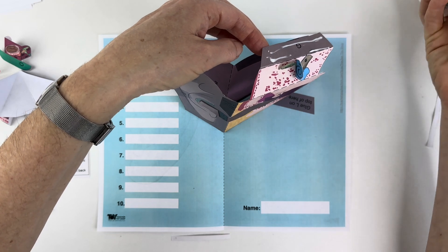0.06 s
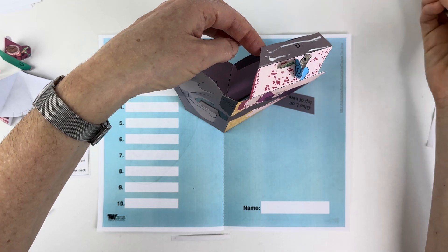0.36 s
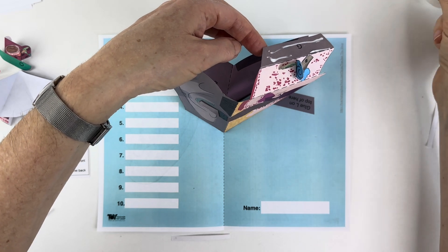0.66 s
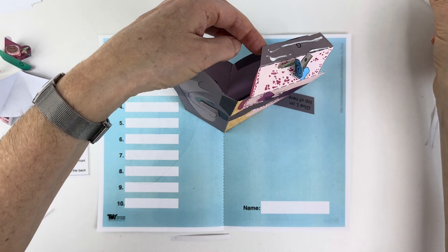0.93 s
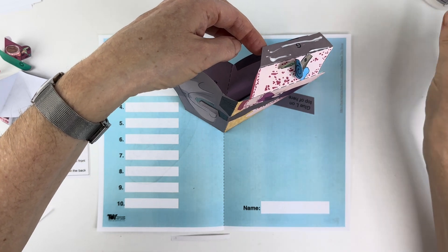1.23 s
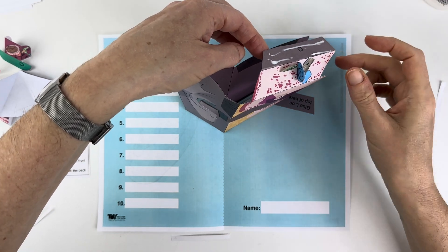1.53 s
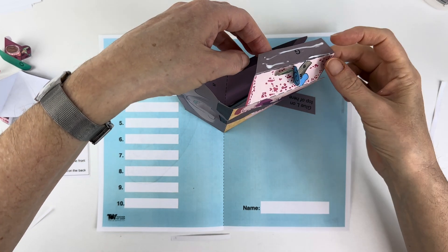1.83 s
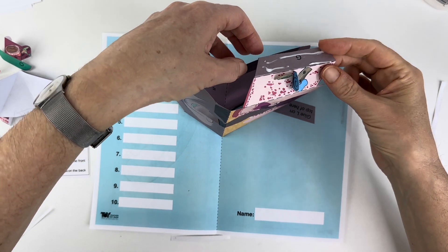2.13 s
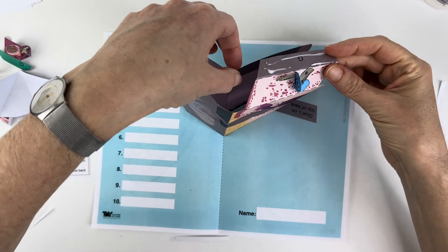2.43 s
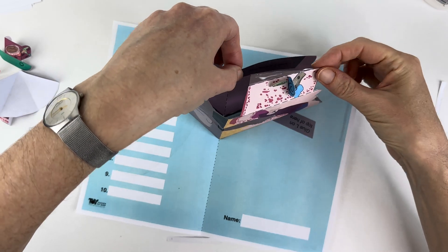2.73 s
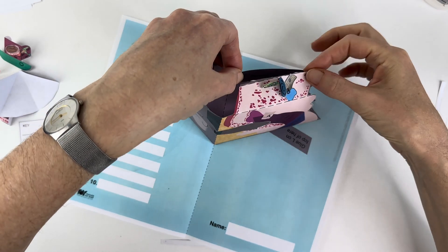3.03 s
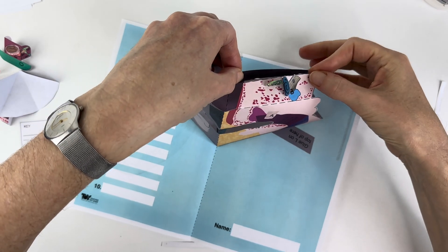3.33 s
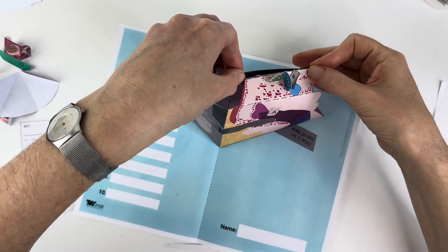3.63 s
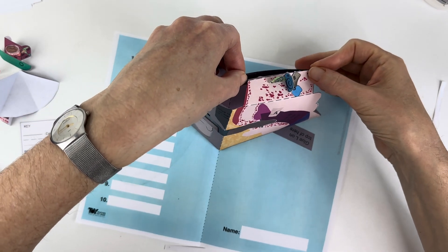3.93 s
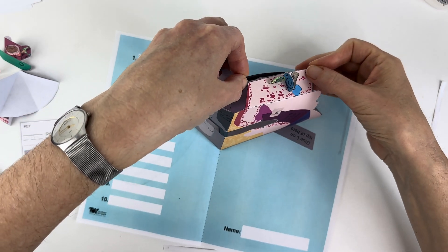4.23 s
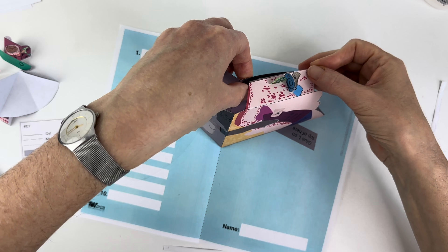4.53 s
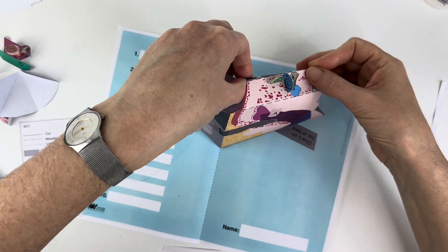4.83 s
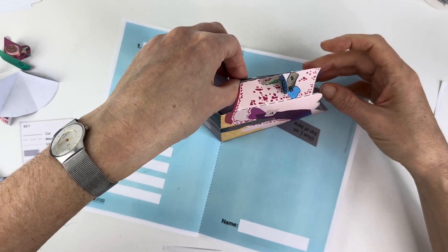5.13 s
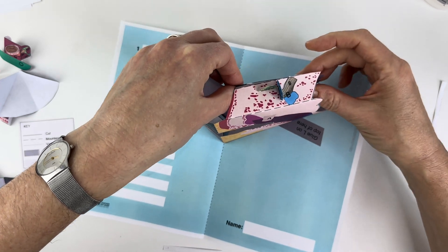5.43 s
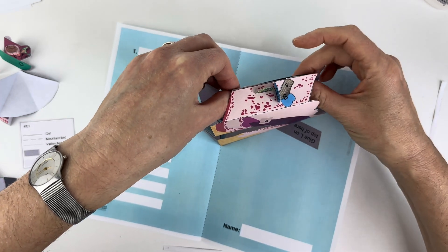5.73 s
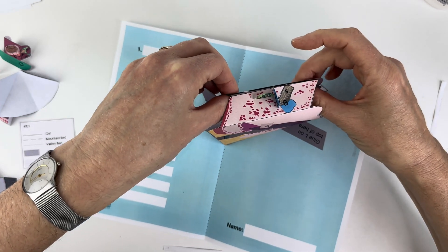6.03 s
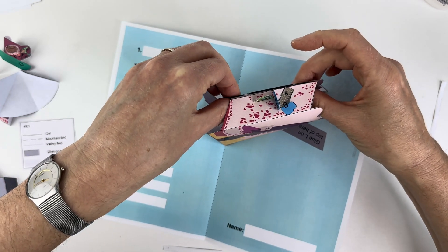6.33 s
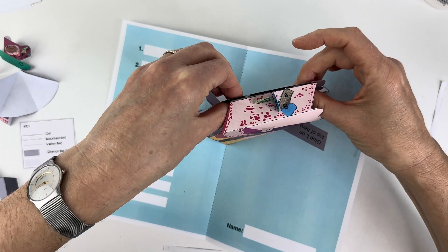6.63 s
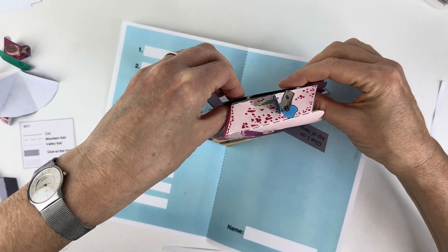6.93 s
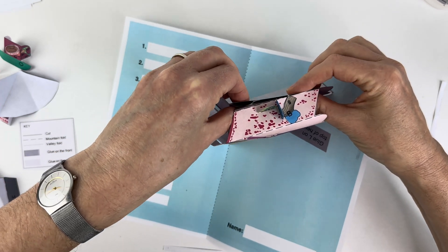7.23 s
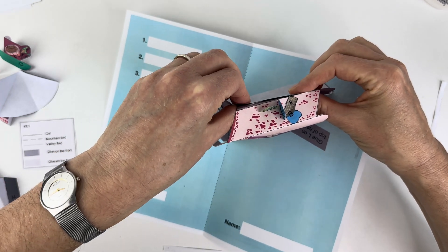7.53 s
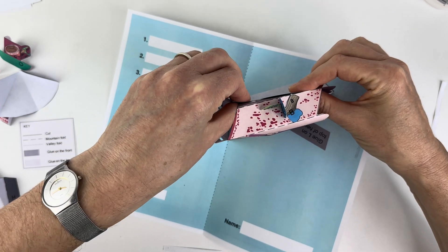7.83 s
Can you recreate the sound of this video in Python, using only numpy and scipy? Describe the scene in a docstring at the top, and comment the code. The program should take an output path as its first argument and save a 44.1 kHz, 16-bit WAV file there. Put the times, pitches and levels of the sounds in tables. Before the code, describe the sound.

Hands press and rub a small hollow card model, with soft taps, scrapes and rustles over a low room hum.

```python
"""A small hollow card model sounds as two hands press its glued flaps together on a desk.
Fingertips buckle the card and set its flaps ringing; friction of skin, paper and cut edges excites
its resonances, and the squeezed joint creaks faintly. Bumps drive the desk's bending modes and rattle
the card. A close two-port microphone also hears the quiet room: motor hum, rumble, hiss, a faint whine."""
import sys
import numpy as np
from scipy import signal
from scipy.fft import rfft, irfft
from scipy.io import wavfile
from scipy.ndimage import uniform_filter1d

SR = 44100
rng = np.random.default_rng(int(sys.argv[2]) if len(sys.argv) > 2 else 0)


def pcm_store(signal):
    """Save signal as 16-bit PCM."""
    levels = np.round(np.clip(np.atleast_2d(signal), -1, 1) * 32767)
    wavfile.write(sys.argv[1], SR, levels.astype(np.int16).T)


N = 347067
TIME = np.arange(N) / SR

# motor hum and high whine: (frequency [Hz], rms level [dB])
ROOM_TONES = [(131.7, -57), (263.4, -78.5), (15558, -81.5)]
# rumble, hiss and diffuse air noise of the room: (frequency [Hz], spectral density [dB])
RUMBLE_SPECTRUM = [(10, -116), (25, -92), (52, -73), (80, -76), (110, -83), (145, -74), (185, -87.5),
                   (260, -97), (450, -101), (750, -119), (2000, -145)]
HISS_SPECTRUM = [(500, -125), (850, -113), (1020, -104), (1150, -102), (1550, -92.5), (2500, -94),
                 (3800, -101), (4700, -109.5), (5400, -107), (5950, -113), (7000, -108), (8600, -123),
                 (12500, -131), (15600, -112)]
AIR_SPECTRUM = [(30, -108), (130, -96.5), (220, -99), (450, -101), (800, -109), (1400, -116), (3000, -123),
                (4300, -121), (4950, -114), (5700, -124), (9000, -135)]
# squeeze of the fingers on the joint: (time [s], grip [0-1])
JOINT_GRIP = [(0, 0.08), (1.7, 0), (2.1, 0.9), (2.8, 0), (2.88, 0), (3.3, 0), (3.6, 0.23), (5.9, 0.76),
              (6.5, 0.4), (7.4, 1), (7.8, 0.1)]
# resonances of the hollow model: (frequency [Hz], bandwidth [Hz], gain [dB])
CARD_RESONANCES = [(310, 45, 2), (365, 50, 1), (480, 45, 0), (765, 55, 5), (985, 70, 4), (1050, 60, 1),
                   (1270, 50, 1), (1580, 70, 5), (1890, 70, 5), (2060, 80, 4), (2680, 70, 5), (3060, 80, 3),
                   (3540, 80, 4)]
# taps on the card, mostly by fingertips; the row at 0.967 s is the card's sharp first clack as a desk bump
# jolts it: (time [s], knock level [dB], hardness [0 pad to 1 nail], scuff level [dB], buckling t60 [s], flap
# pitch [Hz], ring level [dB], overtone tilt [dB/octave])
CARD_TAPS = [(.213, -50.5, 0.14, -59, 0.1, 313, -55, 6), (.231, -51, 0.48, -54, 0.1, 733, -48, -7),
             (.7458, -47, 0.64, -53, 0.034, 1970, -47, -15),
             (.967, -51.5, 0.67, -72, 0.037, 1114, -52, -8),
             (2.759, -62, 0.83, -49, 0.082, 1090, -67, -4), (2.818, -63, 0.6, -59, 0.041, 970, -79, 0),
             (3.496, -57, 1, -69, 0.028, 1070, -70, 6), (3.644, -58, 0.42, -55, 0.11, 1050, -60, -6),
             (3.668, -66, 0.37, -49, 0.1, 1065, -56, -10), (4.015, -65, 0.43, -69, .04, 870, -65, -6),
             (4.159, -56.5, 0.34, -50.5, .06, 1060, -59, 18),
             (4.168, -53, .48, -52, 0.047, 1010, -53.5, 10), (4.178, -70, 0.39, -72, 0.066, 467, -57, 5),
             (4.367, -67, 0.75, -67, 0.1, 1060, -60, 4), (4.4192, -55, 0.9, -48, 0.027, 1020, -52.5, -15),
             (4.535, -72, 0.47, -69, 0.035, 1030, -68, 4), (4.707, -66, 0.51, -67, .05, 760, -70, -3),
             (5.383, -56, 0.63, -70, 0.14, 900, -58, -5), (5.414, -50.5, .8, -51.5, 0.023, 467, -48, 5),
             (5.459, -58, 0.33, -58, .07, 480, -53, 6), (5.4837, -49, 0.63, -37.5, .03, 2035, -41, -16),
             (5.4989, -41, 0.84, -45, 0.026, 795, -41, 3),
             (5.504, -41, 0.7, -66, 0.028, 1603, -46.5, -12), (5.508, -38, 0.53, -69, .03, 350, -45, 1),
             (5.546, -64, 0.49, -56, 0.039, 2050, -55, -14), (5.563, -66, .91, -66, .05, 1970, -61, -12),
             (5.671, -51, .6, -74, 0.065, 370, -55.5, 4), (5.94, -72, 0.61, -61, .06, 1040, -64, 0),
             (6.025, -55.5, 0.42, -76, 0.1, 396, -51.5, -24), (6.154, -63, 0.33, -63, 0.07, 765, -77, -1),
             (6.293, -72, .6, -67, .04, 1020, -65, 4), (6.486, -75, 0.55, -70, .04, 1000, -72, 2),
             (6.666, -57, 0.4, -80, 0.068, 397, -59, -7),
             (6.719, -52.5, 0.67, -54, 0.054, 1044, -49.5, 2),
             (6.996, -66, 0.5, -53, 0.051, 1010, -73, -2),
             (7.026, -48.5, 0.18, -70, 0.053, 372, -49, 5.5),
             (7.147, -60.5, 0.35, -61, 0.024, 974, -73, 3), (7.22, -56, 0.52, -60, 0.19, 994, -70, -2),
             (7.429, -77, 0.44, -61, .02, 1000, -78, 0),
             (7.4715, -40, 0.61, -67, 0.032, 1863, -50.5, -10)]
# scuff of a touch: (frequency [Hz], relative density [dB])
SCUFF_SPECTRUM = [(1000, 5), (2400, 5), (3500, 0), (4700, -1), (9500, -3), (13000, -23), (16000, 1)]
# modes of a flap: (frequency ratio [1], relative level [dB], t60 [s])
FLAP_MODES = [(0.998, 3, 0.045), (1.96, -1, 0.015), (3.52, -9.5, 0.028)]
# bumps on the desk: (time [s], level [dB], contact time [s])
DESK_BUMPS = [(0.392, -53, 0.0016), (0.7431, -23.5, 0.0017), (.934, -47, 0.0023), (0.9654, -35.5, .0014),
              (1.086, -51.5, 0.0021)]
# modes of the desk top: (frequency [Hz], relative level [dB], t60 [s])
DESK_MODES = [(110, -4.5, 0.45), (133, 5.5, 0.12), (175, -2.5, .3), (270, -1.5, 0.14), (303, -12.5, 0.24),
              (404, -12, .18), (490, -28, .09), (573, -22, 0.073), (690, -26, .12)]
# first bending wave through the desk: (frequency [Hz], relative density [dB])
DESK_WAVE_SPECTRUM = [(60, -28), (130, -23), (230, 7), (420, 5), (700, -20), (2000, -5), (5000, -47)]
# strokes of skin and paper: (time of peak speed [s], slowing time [s], level [dB], pressure [0-1])
RUB_STROKES = [(0.44, 0.26, -65.5, 0.65), (1.777, 0.17, -64.5, 0.46), (1.88, 0.38, -64.5, 0.3),
               (2.196, 0.21, -60.5, .25), (2.407, 0.089, -62, 0), (2.613, 0.27, -59.5, 0.34),
               (2.738, 0.25, -58, 0), (3.003, 0.11, -63, 0), (3.235, .1, -59, .13), (3.497, 0.11, -60, 0.5),
               (3.807, 0.53, -66.5, 0.63), (4.24, 0.3, -59.5, 0.25), (4.586, 0.19, -56.5, 0.71),
               (4.706, 0.25, -61, 0.79), (4.919, 0.081, -62, 0.8), (5.22, 0.82, -67, 0),
               (5.386, 0.053, -57.5, 0.93), (5.462, 0.12, -56.5, 0.54), (5.57, 1, -68, 1),
               (5.86, 0.1, -55.5, 0.46), (6.99, 0.21, -65, 0.6), (7.313, 0.2, -64, 0.46)]
# fingertip drag, card rasp, fibre hiss and scraping edge: (frequency [Hz], relative density [dB])
DRAG_SPECTRUM = [(150, -64), (380, 0.5), (750, 0.5), (1150, -9.5), (3000, -22), (8000, -69)]
RASP_SPECTRUM = [(500, -28), (1200, -3), (2200, -2), (3500, -6), (5000, -5), (10000, -24)]
FIBRE_SPECTRUM = [(1000, -37), (3500, 13.5), (5000, 10.5), (7000, 6), (10000, -7), (13000, -29), (16000, 1)]
EDGE_SPECTRUM = [(700, -21), (1400, -5), (2500, 0), (3900, -2), (5000, -7), (10000, -13.5), (13000, -43)]
# strokes of a cut edge: (time of peak speed [s], slowing time [s], level [dB])
EDGE_STROKES = [(2.092, 0.088, -49.3), (2.324, 0.071, -56), (2.679, 0.18, -53), (5.856, 0.1, -53)]
# lead of the left port over the right: (frequency [Hz], phase [rad])
PORT_PHASE = [(560, 0), (760, -1.7), (1000, .1), (1300, -.4), (1600, 0), (2450, -.2), (2750, .4),
              (4100, -.1), (4700, -1.1), (5200, -5.2), (5600, -6.1), (6300, -6.4), (9500, -8),
              (12500, -9.4), (15800, -10.4)]


def undb(db):
    """Amplitude grows tenfold for every 20 dB."""
    return 10 ** (np.asarray(db) / 20)


def unit(x):
    """Normalisation sets the rms to 1."""
    return x / np.sqrt(np.mean(x ** 2))


def decay(t, t60):
    """Damping lowers a vibration exponentially, by 60 dB in t60 seconds."""
    return np.exp(-np.log(1000) * t / t60)


def along(points):
    """Interpolation over log frequency gives a table's value at every spectral bin."""
    hz, value = np.transpose(points)
    return np.interp(np.log(np.fft.rfftfreq(N, 1 / SR) + 0.00089), np.log(hz), value)


def colour(x, points):
    """Filtering multiplies the spectrum by a curve of (frequency [Hz], gain [dB])."""
    return irfft(rfft(x) * undb(along(points)), N)


def noise(points):
    """Filtered white noise takes on the given spectral density."""
    return colour(rng.standard_normal(N), points) * np.sqrt(SR / 2)


def wander(rate_hz):
    """Smoothing random steps gives a slow fluctuation of rms 1."""
    size = int(SR / rate_hz)
    steps = np.repeat(rng.standard_normal(N // size + 1), size)
    return unit(uniform_filter1d(uniform_filter1d(steps, size), size)[:N])


def add(track, s, sound):
    """Sounds superpose: a short one joins the track at time s."""
    start = int(s * SR)
    track[start:start + len(sound)] += sound[:N - start]


def grains(per_s, spread_db):
    """Fibres catch independently, forming a Poisson train of unequal clicks."""
    hits = rng.random(N) < per_s / SR
    signs = rng.choice([-1, 1], N)
    sizes = undb(spread_db * np.minimum(rng.exponential(size=N), 4))
    return unit(hits * signs * sizes)


def bend(x, lag_s):
    """Dispersion: high bending waves arrive first, so a click falls in pitch; lag_s holds at 1 kHz."""
    hz = np.fft.rfftfreq(2 * len(x), 1 / SR)
    phase = 4 * np.pi * lag_s * np.sqrt(1000 * hz)
    return irfft(rfft(x, 2 * len(x)) * np.exp(-1j * phase))[:len(x)]


def background(waver_db=1.84, swell_db=1):
    """A motor's harmonic hum and a faint whine superpose on broadband rumble and hiss."""
    tones = sum(undb(db) * np.sqrt(2) * np.sin(2 * np.pi * (hz * TIME + rng.random()))
                for hz, db in ROOM_TONES)
    tones *= undb(waver_db * wander(1.946))
    rumble = noise(RUMBLE_SPECTRUM) * undb(swell_db * wander(4.9))
    return tones + rumble + noise(HISS_SPECTRUM)


def creaks(level_db=-76, t60=0.1):
    """Stick-slip: the squeezed joint yields in dull ticks whose amplitude follows the grip."""
    ticks = grains(per_s=70, spread_db=2) * np.interp(TIME, *np.transpose(JOINT_GRIP))
    envelope = signal.fftconvolve(np.abs(ticks), decay(TIME[:SR // 10], t60))[:N]
    bursts = envelope * rng.standard_normal(N)
    dull = colour(bursts, [(200, -12), (500, -4), (1100, 0), (2000, -6), (8000, -26)])
    return unit(dull) * undb(level_db)


def card_body(x, direct_db=-4):
    """Resonance: the hollow model reinforces contact sounds near its natural frequencies."""
    rings = sum(undb(db) * signal.lfilter(*signal.iirpeak(hz, hz / width, fs=SR), x)
                for hz, width, db in CARD_RESONANCES)
    return undb(direct_db) * x + .5 * rings


def knocks(touches, pad_hz=318, nail_hz=2630, half_band_octaves=0.92, rise_s=0.0003, snap_t60=0.027):
    """Buckling: a touch gives a snap and a burst of clicks, higher if harder, while fibres scuff."""
    out, t = np.zeros(N), TIME[:SR // 6]
    buckles = grains(per_s=26000, spread_db=2)
    fibres = colour(grains(per_s=10000, spread_db=-4.5), SCUFF_SPECTRUM)
    for s, db, hardness, scuff_db, t60, *_ in touches:
        now = (int(s * SR) + np.arange(len(t))) % N
        envelope = (1 - np.exp(-t / rise_s)) * decay(t, t60)
        centre_hz = pad_hz * (nail_hz / pad_hz) ** hardness
        edges_hz = centre_hz * 2 ** (half_band_octaves * np.array([-1, 1]))
        band = signal.butter(3, edges_hz, "bandpass", fs=SR, output="sos")
        snap = unit(bend(signal.sosfilt(band, 1. * (t == 0)), lag_s=0.000898))
        burst = unit(signal.sosfilt(band, buckles[now] * envelope))
        knock = unit(burst + snap * snap_t60 / t60)  # the snap dominates short touches
        scuff = unit(fibres[now] * envelope)
        touch = undb(db) * knock + undb(scuff_db) * scuff
        add(out, s, touch * np.sqrt(.01 / t[-1]))  # energy referred to 10 ms
    return out


def flaps(rise_s=0.00035):
    """Free vibration: a tapped flap rings in damped modes, pitched by how much the fingers leave free."""
    out, t = np.zeros(N), TIME[:SR // 8]
    for s, *_, hz, db, tilt_db in CARD_TAPS:
        ring = sum(undb(mode_db + tilt_db * np.log2(ratio))
                   * np.sin(2 * np.pi * hz * ratio * t) * decay(t, t60)
                   for ratio, mode_db, t60 in FLAP_MODES)
        ring *= 1 - np.exp(-t / rise_s)
        add(out, s, undb(db) * unit(ring) * np.sqrt(.01 / t[-1]))  # energy referred to 10 ms
    return out


def desk(wave_db=-11, radiation_hz=86):
    """Impact launches a bending wave and rings the desk's modes; shorter contact sounds brighter."""
    out, t = np.zeros(N), TIME[:SR // 2]
    ring = sum((-1) ** k * undb(db) * np.sin(2 * np.pi * hz * t) * decay(t, t60)
               for k, (hz, db, t60) in enumerate(DESK_MODES))
    wave = unit(colour(1. * (TIME == 0), DESK_WAVE_SPECTRUM)[:len(t)])
    response = bend(ring + wave * np.std(ring) * undb(wave_db), lag_s=0.00259)
    for s, db, contact_s in DESK_BUMPS:
        force = np.sin(np.pi * np.minimum(t[:SR // 50] / contact_s, 1)) ** 2
        add(out, s, undb(db) * signal.fftconvolve(response, force / force.sum()))
    # the desk radiates low frequencies poorly
    return signal.sosfilt(signal.butter(2, radiation_hz, "highpass", fs=SR, output="sos"), out)


def rattle_touches(full_jolt_db=-24.5, growth=0.74, sharp_contact_s=0.0027,
                   lag_s=0.0062, hardness=0.044, scuff_db=-11.5, t60=0.13):
    """Base excitation: each bump jolts the card against the desk, more when strong and abrupt."""
    touches = []
    for s, db, contact_s in DESK_BUMPS:
        jolt_db = db + 40 * np.log10(sharp_contact_s / contact_s)
        knock_db = full_jolt_db + growth * jolt_db
        touches.append((s + lag_s, knock_db, hardness, knock_db + scuff_db, t60))
    return touches


def stroke(peak_s, slowing_s, rise_ratio=0.84, speed_exponent=5.2):
    """Friction noise power follows a power law of speed, which rises and falls over a stroke."""
    speed = np.interp(TIME, [peak_s - rise_ratio * slowing_s, peak_s, peak_s + slowing_s], [0, 1, 0])
    return speed ** speed_exponent


def crackle(low_hz=4300, high_hz=10300):
    """Fibres flick free and ring as damped resonators, each at its own high pitch."""
    return unit(sum(signal.lfilter(*signal.iirpeak(hz, Q=7, fs=SR), grains(per_s=140, spread_db=3))
                    for hz in np.geomspace(low_hz, high_hz, 10)))


def slides(catch_db=1.5, crackle_db=-2.5):
    """Sliding friction: skin and paper catch unevenly; pressure lifts drag and rasp over fibre hiss."""
    power = np.zeros((3, N))
    for s, slowing_s, db, pressure in RUB_STROKES:
        drag_db = db - 17 + 19 * pressure
        rasp_db = db - 18.5 + 16 * pressure
        power += np.outer(undb([drag_db, rasp_db, db]) ** 2, stroke(s, slowing_s))
    drag = unit(colour(grains(per_s=1100, spread_db=3), DRAG_SPECTRUM))
    rasp = unit(colour(grains(per_s=1400, spread_db=7.5), RASP_SPECTRUM))
    hiss = unit(colour(grains(per_s=2000, spread_db=0.5), FIBRE_SPECTRUM))
    fibres = unit(hiss + undb(crackle_db) * crackle())
    return np.sum(np.sqrt(power) * [drag, rasp, fibres], axis=0) * undb(catch_db * wander(90))


def scrapes(catch_db=1.5):
    """Stick-slip: a cut edge stutters across the card in bright, gritty clicks."""
    power = sum(undb(db) ** 2 * stroke(s, slowing_s) for s, slowing_s, db in EDGE_STROKES)
    grit = unit(colour(grains(per_s=2600, spread_db=0.5), EDGE_SPECTRUM))
    return np.sqrt(power) * grit * undb(catch_db * wander(110))


def ports(x):
    """Phase difference: both ports receive the same level, shifted by a frequency-dependent angle."""
    turn = np.exp(.5j * along(PORT_PHASE))
    return irfft(rfft(x) * np.array([turn, turn.conj()]), N)


def room(x, wet_db, t60=0.21, first_echo_s=0.008, dull_hz=4500):
    """Reverberation: wall reflections merge into a short, dull tail, different at each port."""
    t = TIME[:SR // 2]
    tail = rng.standard_normal((2, len(t))) * decay(t, t60) * (t > first_echo_s)
    tail = signal.lfilter(*signal.butter(1, dull_hz, fs=SR), tail)
    tail /= np.sqrt(np.sum(tail ** 2, axis=1, keepdims=True))
    return undb(wet_db) * signal.fftconvolve(x[None], tail, axes=1)[:, :N]


def scene(desk_left_db=0.6):
    """Superposition: direct sound, reverberation and diffuse air noise add at the two ports."""
    contacts = creaks() + knocks(CARD_TAPS + rattle_touches()) + slides() + scrapes()
    paper = card_body(contacts) + flaps()
    thuds = desk()
    desk_pan = undb([[desk_left_db / 2], [-desk_left_db / 2]])
    direct = ports(paper + background()) + ports(thuds) * desk_pan
    reverberation = room(paper, wet_db=-16.5) + room(thuds, wet_db=-30)
    air = np.array([noise(AIR_SPECTRUM), noise(AIR_SPECTRUM)])
    return direct + reverberation + air


def record(dry, cutoff_hz=15850):
    """Band limiting: a steep low-pass filter removes the highest treble."""
    return signal.sosfilt(signal.ellip(10, .1, 80, cutoff_hz, fs=SR, output="sos"), dry)


dry = scene()
out = record(dry)
pcm_store(out)
```